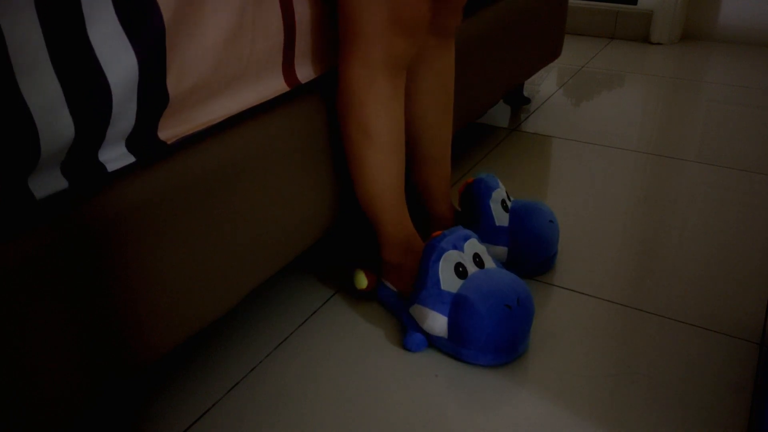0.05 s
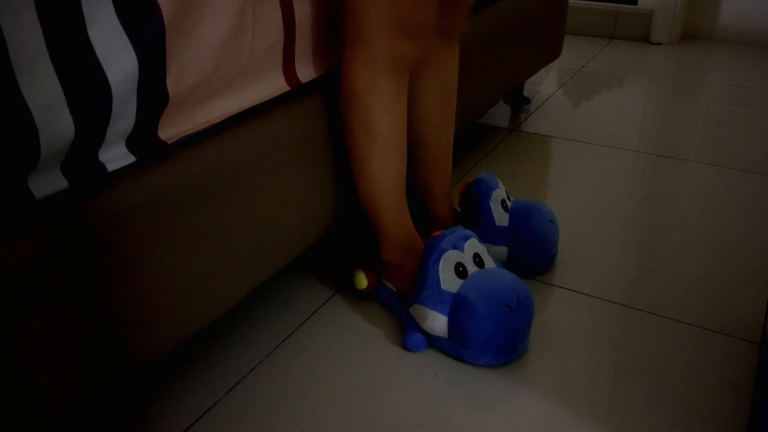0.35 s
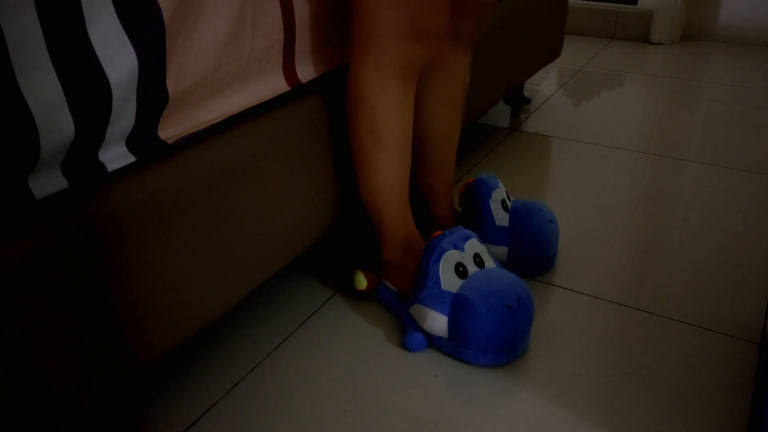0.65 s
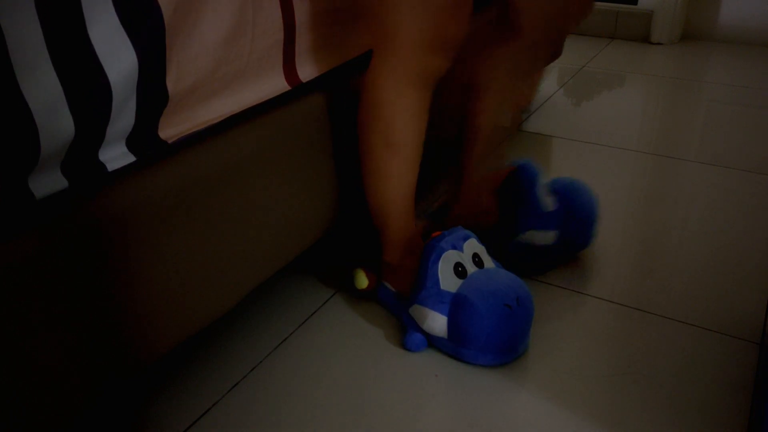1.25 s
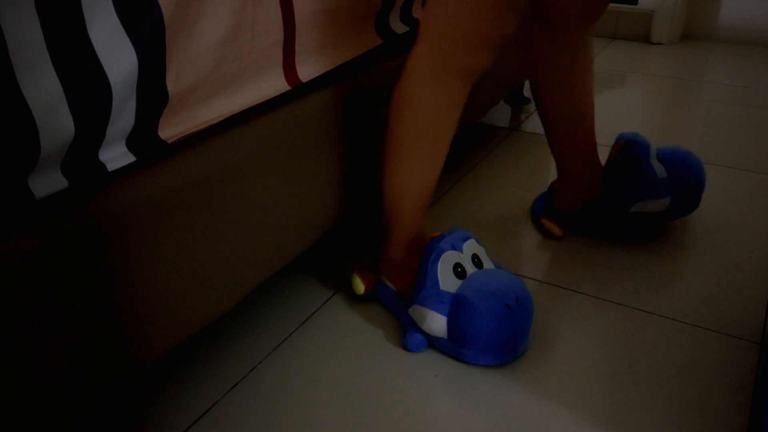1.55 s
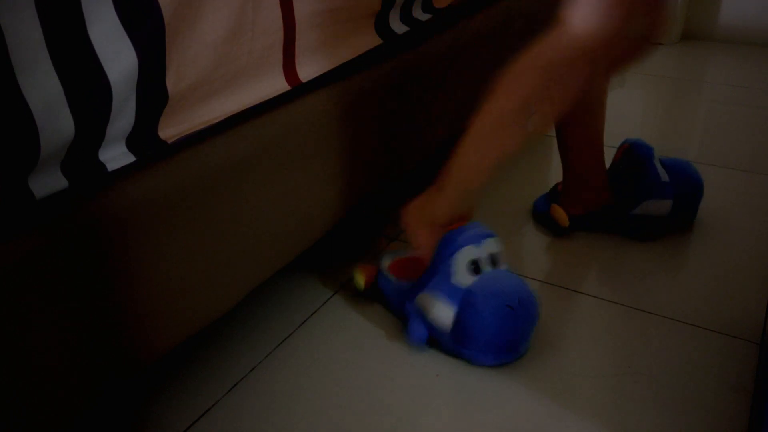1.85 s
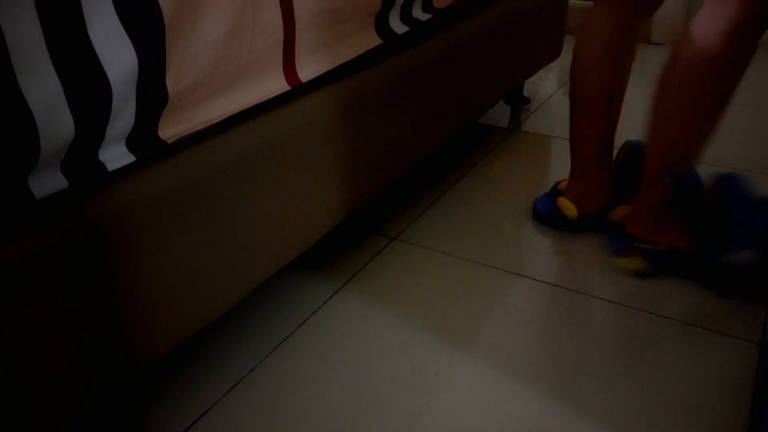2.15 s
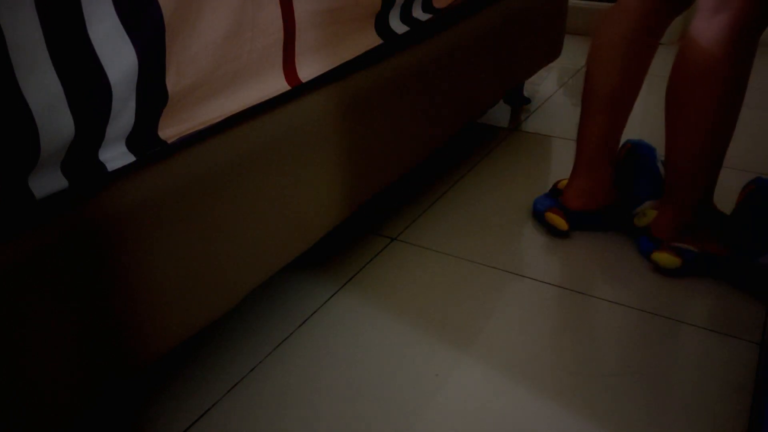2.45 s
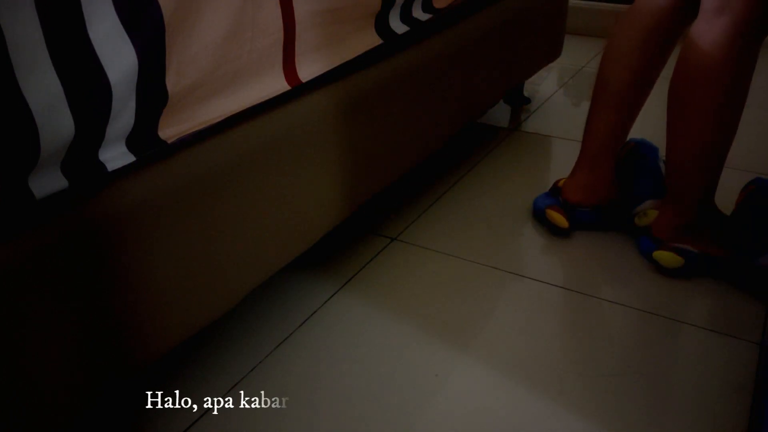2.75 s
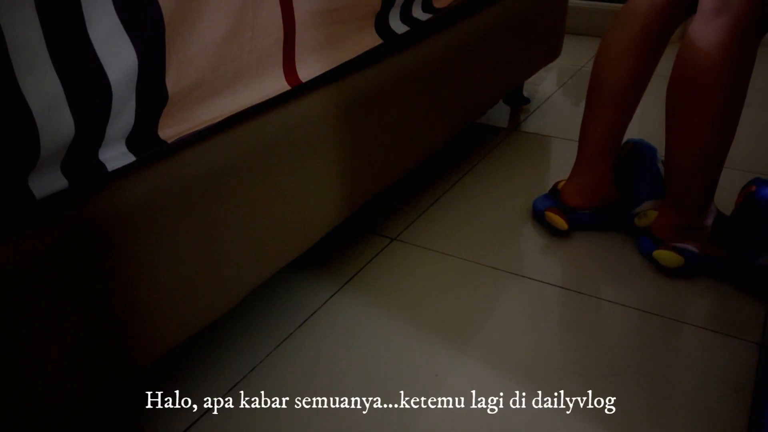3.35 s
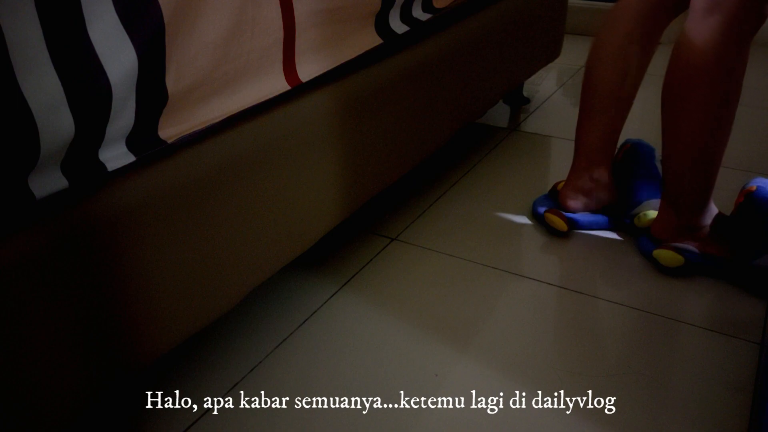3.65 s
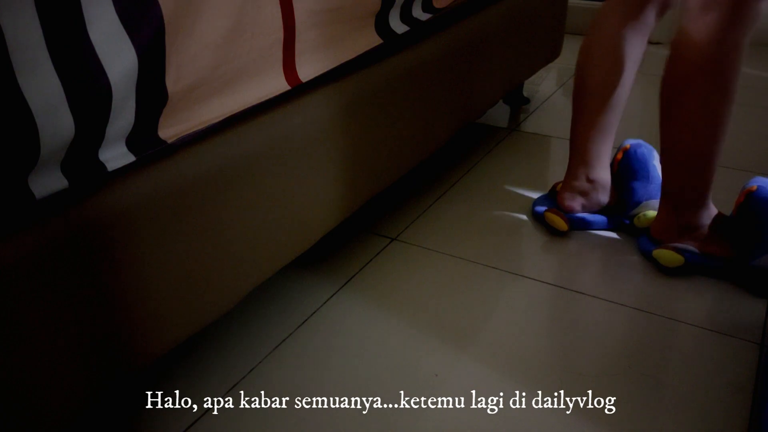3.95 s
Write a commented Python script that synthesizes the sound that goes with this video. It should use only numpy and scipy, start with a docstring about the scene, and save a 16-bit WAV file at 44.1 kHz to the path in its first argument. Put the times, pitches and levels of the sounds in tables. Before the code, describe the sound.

Slippers brush over tiles close by in a small bedroom, cloth rustles and a foot lands with a thud. Then a door opens with a clunk and rattle, a short high squeak and a soft bump, over faint hum.

```python
"""A small, hard bedroom with a tiled floor. Someone gets off a bed and shuffles in plush slippers:
sliding friction makes cloth hiss and soles scuff, and one foot lands with a thud. A door is opened:
the handle clunks and the latch rattles back, exciting modes of wood and metal; the hinge squeaks
by stick-slip and the leaf bumps. The room reverberates briefly over a low hum."""
import sys
import numpy as np
from scipy import signal
from scipy.fft import rfft, irfft
from scipy.io import wavfile

SR = 44100
rng = np.random.default_rng(int(sys.argv[2]) if len(sys.argv) > 2 else 0)


def pcm_store(signal):
    """Save signal as 16-bit PCM."""
    levels = np.round(np.clip(np.atleast_2d(signal), -1, 1) * 32767)
    wavfile.write(sys.argv[1], SR, levels.astype(np.int16).T)


N = 176400
T = np.arange(N) / SR

# spectra of background, plush, soles and dull rumble (frequency [Hz], relative level [dB])
ROOM_TONE_SPECTRUM = [(20, -25), (33, -19), (50, 2), (70, -2.5), (95, 1), (150, -10), (250, -13),
                      (370, -20), (560, -26.5), (900, -30), (2100, -34), (4900, -38.5), (7200, -35),
                      (12000, -36.5), (16000, -44)]
PLUSH_SPECTRUM = [(100, -12), (500, -9), (1400, -6), (3200, -5), (4700, .5), (7200, 0), (9700, 0),
                  (12600, 4), (14500, 0), (16000, -8)]
RASP_SPECTRUM = [(100, -9), (300, -2), (520, -2.5), (900, 1), (2100, 2), (3300, -.5), (5000, .5),
                 (16000, -7)]
RUMBLE_SPECTRUM = [(25, -25), (55, 0), (105, 2), (150, -11), (230, -9), (400, -30), (2000, -60)]
# envelopes of the hum and of moving cloth (time [s], level [dB])
HUM_LEVEL = [(0, -63), (.7, -78), (1.3, -68), (1.8, -72), (2.15, -59), (2.6, -58), (3.1, -63), (3.5, -59),
             (3.8, -65), (4, -63)]
CLOTH_LEVEL = [(0, -61), (.12, -61), (.42, -63), (.62, -78), (.88, -80), (1.02, -69), (1.25, -70),
               (1.45, -73), (1.6, -64), (1.88, -60), (2.15, -60), (2.4, -60), (2.55, -62), (2.63, -63),
               (2.72, -70), (3.05, -80), (4, -80)]
# soles brush the tiles (peak [s], 7 dB rise [s], 7 dB fall [s], hiss [dB], rasp [dB], rasp cutoff [Hz])
SCUFFS = [(.22, .06, .06, -48, -52, 5000), (.385, .06, .025, -48.5, -51.5, 3500),
          (1.085, .045, .045, -55.5, -53, 1900), (1.2, .01, .03, -66, -66, 1500),
          (1.752, .055, .06, -50, -59, 4500), (1.975, .03, .028, -44, -48, 4500),
          (2.24, .015, .04, -50, -54, 1500), (2.315, .05, .032, -43, -45, 3500),
          (2.479, .003, .008, -59, -72, 3000), (2.585, .003, .025, -60, -69, 1500)]
# a sole catches (time [s], pitch [Hz], Gaussian width [s], level [dB])
CATCHES = [(.195, 950, .012, -56), (.243, 1000, .008, -54), (.243, 3000, .01, -55), (.37, 850, .006, -48),
           (.408, 1550, .008, -48), (1.952, 2000, .007, -48), (1.976, 1850, .003, -38)]
# a foot takes weight (time [s], thud [dB], slap [dB])
FOOTFALLS = [(1.068, -47, -70), (1.14, -49, -80), (2.22, -28.5, -36), (2.241, -37, -60), (2.26, -35, -62)]
# bursts of body and door noise (start [s], attack [s], hold [s], release [s], level [dB])
WEIGHT_SHIFTS = [(.99, .02, .05, .03, -53), (1.42, .02, .05, .02, -53), (1.85, .015, .06, .015, -47)]
LEAF_SHUDDERS = [(2.712, .01, .03, .01, -45), (2.787, .008, .02, .015, -30), (2.88, .02, .04, .015, -37),
                 (3.03, .03, .1, .04, -51), (3.926, .008, .05, .05, -40)]
HANDLE_CLUNK = (2.756, .02, .027, .018, -34)
LATCH_RATTLE = (2.827, .012, .044, .018, -26.5)
FRAME_SCRAPES = [(3.186, .003, .03, .045, -66), (3.296, .008, .04, .035, -49.5), (3.39, .01, .06, .02, -57)]
LEAF_BUMP = (3.908, .009, .042, .045, -45)
# handle and latch knock on the leaf (time [s], level [dB])
KNOCKS = [(2.728, -47), (2.746, -43), (2.7745, -23.5), (2.786, -25), (2.837, -32)]
# modes of foot on floor, wooden leaf and metal fittings (frequency [Hz], level [dB], T60 [s])
THUD_MODES = [(135, -10, .12), (195, -6, .07), (248, -2, .15), (315, -4, .06), (377, -4, .07),
              (468, -6, .06), (590, -8, .03)]
LEAF_MODES = [(342, -3, .09), (430, -3, .05), (527, 0, .09), (622, -9, .05)]
METAL_MODES = [(1205, -1, .16), (1350, -1, .16), (1637, -2, .16), (2305, 0, .16), (2395, -4, .2),
               (2870, -9, .14), (4260, -10, .16), (5600, -10, .18), (6840, -15, .16)]
# spectra of the door's contacts (frequency [Hz], relative level [dB])
HANDLE_SPECTRUM = [(60, -12), (200, -6), (350, 0), (530, 0), (750, -5), (1400, -5), (2400, -10),
                   (3500, -17), (5000, -25), (8000, -27), (13000, -32), (16000, -44)]
LATCH_SPECTRUM = [(60, -10), (200, -6), (340, 1), (600, 0), (950, 0), (1400, .5), (2300, -4), (3400, -12),
                  (5500, -12), (7900, -12.5), (9500, -25), (12500, -24), (16000, -46)]
SCRAPE_SPECTRUM = [(100, -6), (600, -3), (1200, 1), (1700, -4), (3300, -3), (4700, 3), (6500, -4),
                   (13000, -7), (16000, -16)]
BUMP_SPECTRUM = [(100, 2), (170, 6), (225, 18), (330, 1), (600, -2), (1000, -3), (1550, 2), (2300, -1),
                 (3000, -12), (4200, -11), (7000, -23), (15000, -36)]
# hinge squeak (time [s], pitch [Hz], fundamental [dB], overtones [dB])
SQUEAK = [(3.33, 2470, -130, -130), (3.355, 2465, -68, -62), (3.37, 2450, -55, -56),
          (3.388, 2436, -54, -58), (3.399, 2426, -37, -52), (3.425, 2417, -38, -53), (3.44, 2414, -45, -60),
          (3.452, 2419, -35, -58), (3.473, 2414, -36, -54), (3.489, 2408, -45, -59),
          (3.508, 2403, -40, -62), (3.535, 2398, -55, -68), (3.58, 2400, -53, -69), (3.625, 2384, -61, -74),
          (3.645, 2375, -80, -90), (3.67, 2370, -130, -130)]
# its overtones (harmonic number [1], relative level [dB])
OVERTONES = [(2, .5), (3, -5), (4, -24)]
# side over mid; left over right for events and for background (frequency [Hz], level difference [dB])
STEREO_WIDTH = [(50, -10), (300, -9), (550, -4), (1000, -1), (2000, 0), (16000, 0)]
EVENT_BALANCE = [(50, 3), (100, 4), (250, 1), (550, -2), (900, 2), (5000, 1.5), (7200, -.5), (9700, -2.5),
                 (13000, -7)]
ROOM_TONE_BALANCE = [(50, 3), (120, 6), (250, 4), (600, 1), (2000, 1), (6000, 3), (13000, -1)]

ROOM_T60_S, TREBLE_T60_S = .3, .35
BIN_HZ = np.arange(N + 1) * SR / (2 * N)


def undb(db):
    """Amplitude grows tenfold every 20 dB."""
    return 10 ** (np.asarray(db) / 20)


def unit(x):
    """Normalisation to unit rms."""
    return x / np.sqrt(np.mean(x ** 2))


def noise():
    """Independent Gaussian samples have a white spectrum."""
    return rng.standard_normal(N)


def curve(rows, column=1):
    """Linear interpolation of a column over time."""
    rows = np.array(rows)
    return np.interp(T, rows[:, 0], rows[:, column])


def response(points):
    """Frequency response, interpolated in dB over log frequency."""
    hz, db = np.array(points).T
    return undb(np.interp(np.log(BIN_HZ + 1), np.log(hz), db))


def shape(x, gain):
    """Filtering is multiplication of the spectrum."""
    return irfft(rfft(x, 2 * N) * gain)[..., :N]


def colour(x, points):
    """Minimum-phase filter that conserves the power of white noise."""
    cepstrum = irfft(np.log(unit(response(points))))
    cepstrum[1:N] *= 2
    cepstrum[N + 1:] = 0
    return shape(x, np.exp(rfft(cepstrum)))


def band(hz, width_hz):
    """A resonance selects one band of noise."""
    return unit(shape(noise(), 1 / (1 + (2 * (BIN_HZ - hz) / width_hz) ** 2)))


def decay(t60):
    """Exponential damping: 60 dB in t60 seconds."""
    return np.exp(-np.log(1000) * T / t60)


def ring(modes):
    """An impulse response is a sum of damped modes."""
    return sum(undb(db) * np.sin(2 * np.pi * hz * T) * decay(t60) for hz, db, t60 in modes)


def strike(blows, modes, contact_s=.0004):
    """Cushioned blows are Gaussian force pulses that excite the modes."""
    force = sum(undb(db) * np.exp(-.5 * ((T - time) / contact_s) ** 2) for time, db, *_ in blows)
    pulse_area = np.sqrt(2 * np.pi) * contact_s * SR
    return .85 * signal.fftconvolve(force / pulse_area, ring(modes))[:N]


def envelope(start, attack, hold, release, db):
    """Linear attack, hold and exponential release."""
    age = T - start
    return undb(db) * np.clip(age / attack, 0, 1) * np.exp(-np.maximum(age - attack - hold, 0) / release)


def stereo(mid, side, balance):
    """Sum and difference: the channels are coherent in the bass, unrelated in the treble."""
    width, tilt = response(STEREO_WIDTH), response(balance)
    side = shape(side, width)
    norm = np.sqrt((1 + width ** 2) * (1 + tilt ** 2) / 2)
    return np.array([shape(mid + side, tilt / norm), shape(mid - side, 1 / norm)])


def room_tone():
    """Superposition of broadband rumble and hiss with a narrowband hum that swells and sinks."""
    mid, side = (undb(-53) * colour(noise(), ROOM_TONE_SPECTRUM)
                 + undb(curve(HUM_LEVEL)) * band(hz=243, width_hz=30) for _ in range(2))
    return stereo(mid, side, ROOM_TONE_BALANCE)


def friction(scatter_db=4):
    """Friction noise is countless tiny slips of uneven size."""
    return unit(noise() * undb(scatter_db * noise()))


def cloth_and_slippers():
    """Friction noise grows with sliding speed; incoherent hisses of cloth and plush add in power."""
    hiss_power, rasp = undb(curve(CLOTH_LEVEL)) ** 2, 0
    for peak, rise, fall, hiss_db, rasp_db, cutoff_hz in SCUFFS:
        speed = np.exp(.8 * np.minimum((T - peak) / rise, (peak - T) / fall))
        hiss_power += (speed * undb(hiss_db)) ** 2
        slips = signal.lfilter(*signal.butter(2, cutoff_hz, fs=SR), friction())
        rasp += speed * undb(rasp_db) * unit(slips)
    hiss = colour(friction() * np.sqrt(hiss_power), PLUSH_SPECTRUM)
    return hiss + shape(rasp, response(RASP_SPECTRUM))


def sole_catches():
    """Momentary sticking of a sole gives a chirp of band-limited noise."""
    return sum(undb(db) * np.exp(-.5 * ((T - time) / width) ** 2) * band(hz, width_hz=.6 * hz)
               for time, hz, width, db in CATCHES)


def rumble(bursts):
    """A shifting body or shuddering leaf radiates low-frequency noise."""
    return colour(noise() * sum(envelope(*row) for row in bursts), RUMBLE_SPECTRUM)


def footfalls():
    """Impact: the sole slaps the tile and the padded foot excites low, damped modes."""
    slaps = sum(envelope(time, attack=.0005, hold=.002, release=.004, db=db) for time, _, db in FOOTFALLS)
    return 1.3 * strike(FOOTFALLS, THUD_MODES) + colour(noise() * slaps, PLUSH_SPECTRUM)


def door_leaf():
    """Forced vibration: the wooden leaf shudders, and knocks of handle and latch excite its modes."""
    return rumble(LEAF_SHUDDERS) + 1.5 * strike(KNOCKS, LEAF_MODES)


def rattle(clicks_per_s=2200, scatter_db=2.5):
    """Loose parts collide as a Poisson process over friction noise."""
    hits = rng.random(N) < clicks_per_s / SR
    clicks = hits * np.sign(noise()) * undb(scatter_db * noise())
    return unit(unit(clicks) + .45 * noise())


def door_contacts():
    """Dense impacts of handle, latch and bumping leaf drive the resonances of the metal fittings."""
    handle, latch, bump = (rattle() * envelope(*row) for row in (HANDLE_CLUNK, LATCH_RATTLE, LEAF_BUMP))
    bodies = colour(handle, HANDLE_SPECTRUM) + colour(latch, LATCH_SPECTRUM) + colour(bump, BUMP_SPECTRUM)
    force = latch + .4 * handle + .6 * bump
    metal = signal.fftconvolve(force, unit(ring(METAL_MODES)) / np.sqrt(N))[:N]
    return bodies + undb(-10) * metal


def frame_scrapes():
    """Dry friction in bursts as the leaf comes free of its frame."""
    return colour(rattle() * sum(envelope(*row) for row in FRAME_SCRAPES), SCRAPE_SPECTRUM)


def hinge(jitter=.0022, flutter=.011, roughness=.13):
    """Stick-slip oscillation: a slightly rough harmonic whistle that sags as the door slows."""
    hz = curve(SQUEAK) * (1 + jitter * band(0, width_hz=120) + flutter * band(0, width_hz=1200))
    phase = 2 * np.pi * np.cumsum(hz) / SR
    overtones = sum(undb(db) * np.sin(harmonic * phase) for harmonic, db in OVERTONES)
    tone = undb(curve(SQUEAK, column=2)) * np.sin(phase) + undb(curve(SQUEAK, column=3)) * overtones
    return np.sqrt(2) * tone * (1 + roughness * band(0, width_hz=600))


def room(x, wet_db, crossover_hz=4000):
    """Reverberation: convolution with the direct path, early floor scatter and a short diffuse tail."""
    def tail(t60):
        return unit(noise() * decay(t60)) / np.sqrt(N)
    low_share = 1 / (1 + (BIN_HZ / crossover_hz) ** 2)
    wet = undb(wet_db)
    mid_tail, side_tail = (shape(tail(ROOM_T60_S), np.sqrt(low_share))
                           + shape(tail(TREBLE_T60_S), np.sqrt(1 - low_share)) for _ in range(2))
    direct, floor_scatter = T == 0, tail(t60=.015)
    mid = signal.fftconvolve(x, direct + wet * mid_tail)[:N]
    side = signal.fftconvolve(x, floor_scatter + wet * side_tail)[:N]
    return stereo(mid, side, EVENT_BALANCE) / np.sqrt(1 + wet ** 2)


def scene():
    """Sources superpose; the door, further off than the feet, has a larger reverberant share."""
    person = cloth_and_slippers() + sole_catches() + rumble(WEIGHT_SHIFTS) + footfalls()
    door = door_leaf() + door_contacts() + frame_scrapes()
    return room_tone() + room(person, wet_db=-5) + room(door, wet_db=-3) + room(hinge(), wet_db=-10)


def record(dry):
    """Band limiting: a steep elliptic low-pass removes the highest treble."""
    return signal.sosfilt(signal.ellip(10, .1, 70, 15700, fs=SR, output="sos"), dry)


dry = scene()
out = record(dry)
pcm_store(out)
```